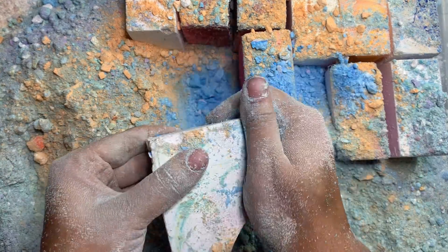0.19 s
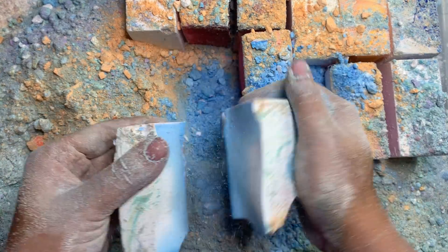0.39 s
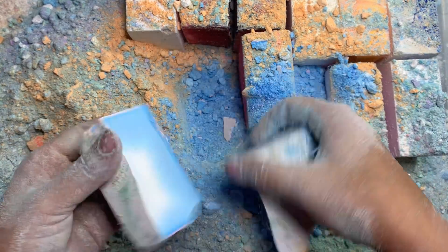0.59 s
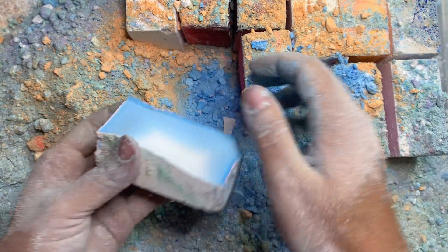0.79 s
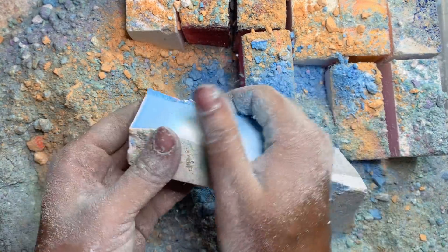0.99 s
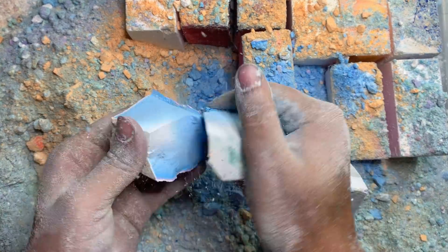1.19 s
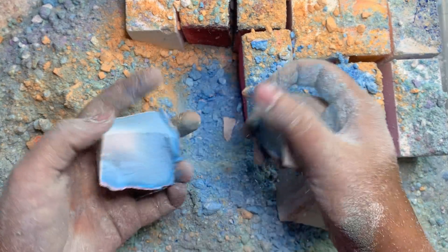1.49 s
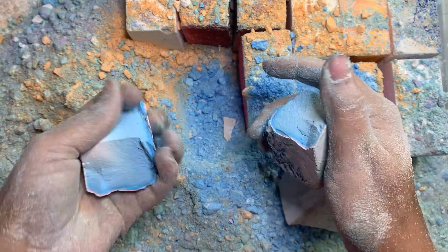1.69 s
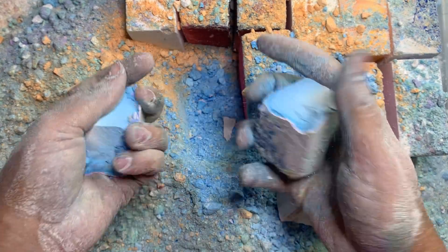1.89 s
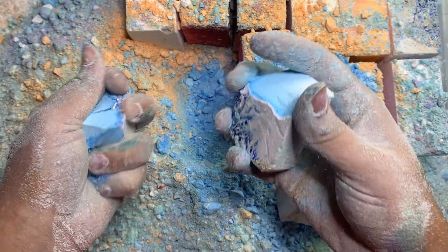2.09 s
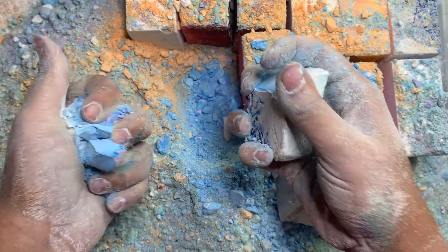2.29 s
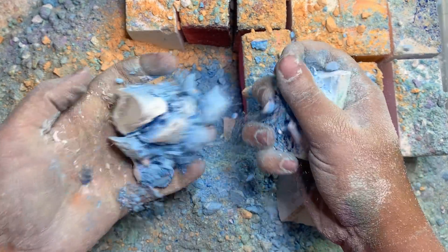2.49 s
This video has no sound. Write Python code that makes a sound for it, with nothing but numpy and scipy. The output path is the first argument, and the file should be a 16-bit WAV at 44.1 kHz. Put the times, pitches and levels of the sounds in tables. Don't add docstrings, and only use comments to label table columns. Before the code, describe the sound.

Chalk block breaking in hands, close up: a crisp snap with dull thump, dusty rubbing and small squeaks, a second snap, more rubbing, then irregular crunching into crumbs; small room, faint low ventilation hum, stereo phone microphone.

```python
import sys
import numpy as np
from scipy import signal
from scipy.fft import rfft, irfft, next_fast_len
from scipy.io import wavfile
from scipy.ndimage import uniform_filter1d

SR = 44100
rng = np.random.default_rng(int(sys.argv[2]) if len(sys.argv) > 2 else 0)


def decibels_to_gain(level_db):
    exponent = np.asarray(level_db, float) / 20
    return 10 ** exponent


def unload_wav(signal):
    wavfile.write(
        sys.argv[1],
        SR,
        np.round(np.clip(np.atleast_2d(signal).T, -1, 1) * 32767).astype(np.int16),
    )


N = 116865


def band(x, hz, width_hz):
    return signal.lfilter(*signal.iirpeak(min(hz, 18000), hz / width_hz, fs=SR), x)


def double_band(x, hz, width_hz, ratio=2):
    return band(band(x, hz, width_hz), hz, ratio * width_hz)


def low_cut(x, hz, order):
    return signal.lfilter(*signal.butter(order, hz, "high", fs=SR), x)


def unit(x):
    return x / np.sqrt(np.mean(x ** 2) + 1e-18)


def walk(rate_per_s):
    k = int(SR / rate_per_s)
    return unit(uniform_filter1d(uniform_filter1d(rng.standard_normal(N), k), k))


def curve(points):
    return np.interp(np.arange(N) / SR, *np.array(points).T)


def add(out, at_s, x):
    i = int(at_s * SR)
    out[i:i + len(x)] += x[:N - i]


def grit(per_s, spread_db, size):
    chance, sign, strength = rng.random((size, 3)).T
    grains = (chance < per_s / SR) * np.sign(sign - .5)
    return unit(grains * decibels_to_gain(-spread_db * np.log(strength + 0.00083)))


# t/s, level/dB
RUSTLE_SWELL = [(0, 0), (.2, -11), (.37, -3), (.6, 0.5), (.76, -0.5), (.92, -15), (1.03, 3.5), (1.25, 3),
                (1.55, 3), (1.79, 4.5), (2.1, 4), (2.38, -5), (2.65, 7.5)]


def rustle_db():
    return curve(RUSTLE_SWELL)


# f/Hz, width/Hz, level/dB
HUM_BANDS = [
    (40.1, 9.2, -58.5),
    (66.7, 16, -56),
    (97.9, 13.6, -60.5),
    (133.8, 19, -54),
    (312.6, 99, -65),
    (419, 106, -66),
    (539, 58, -70.5),
    (944, 560, -77.5),
    (1480, 3000, -87),
]
# t/s, level/dB
RUMBLE_SWELL = [(0.0, -62), (0.221, -61.5), (0.33, -56.5), (0.55, -63.5), (0.729, -67), (1.0, -72.5),
                (1.22, -66), (1.39, -68), (2.38, -68.5), (2.52, -63), (2.65, -65)]
RUMBLE_FROM_HZ, RUSTLE_FROM_HZ, HUM_SIDE_HZ = 250, 700, 600
HUM_WAVER_DB, HUM_WAVER_PER_S = 1.3, 4


def hum():
    out = 0
    swell_db = curve(RUMBLE_SWELL)
    for hz, width_hz, db in HUM_BANDS:
        mid, side = (unit(double_band(rng.standard_normal(N), hz, width_hz, 1.72)) for _ in range(2))
        level_db = db + HUM_WAVER_DB * walk(HUM_WAVER_PER_S)
        if hz > RUSTLE_FROM_HZ:
            level_db = level_db + rustle_db()
        elif hz > RUMBLE_FROM_HZ:
            level_db = level_db + swell_db - swell_db.mean()
        ports = mid + min(hz / HUM_SIDE_HZ, 1) * side * np.array([[1], [-1]])
        out = out + decibels_to_gain(level_db) * ports
    return out


ROOM_DB, ROOM_T60_LOW_S, ROOM_T60_HIGH_S, ROOM_TREBLE_DB, ROOM_SPLIT_HZ = -17, 0.23, 0.21, 5.5, 1620
ROOM_WIDE_HZ, ROOM_WIDE_DB = 2200, 3


def room(x):
    t = np.arange(SR // 2) / SR
    mid, side = rng.standard_normal((2, len(t)))
    side = double_band(side, ROOM_WIDE_HZ, 3 * ROOM_WIDE_HZ, 1)
    noise = mid + decibels_to_gain(ROOM_WIDE_DB) * side * np.array([[1], [-1]])
    low = signal.lfilter(*signal.butter(2, ROOM_SPLIT_HZ, fs=SR), noise)
    bass = unit(low * decibels_to_gain(-60 * t / ROOM_T60_LOW_S))
    treble = unit((noise - low) * decibels_to_gain(-60 * t / ROOM_T60_HIGH_S))
    tail = bass + decibels_to_gain(ROOM_TREBLE_DB) * treble
    tail = tail * np.clip(t / 0.002, 0, 1) / np.sqrt(len(t))
    return decibels_to_gain(ROOM_DB) * signal.fftconvolve(x[None], tail, axes=1)[:, :N]


DUST_DB = -72


def dust():
    level_db = DUST_DB + rustle_db() + 1.5 * walk(36)
    return decibels_to_gain(level_db) * grit(14000, 0.83, size=N)


# f ratio, level/dB
UPPER_RINGS = [
    (1.13, -4),
    (1.5, -7.5),
    (2.101, -5.5),
]
PATCHY_DB, RELEASE_S, SAG_DB = 4, .011, -4


def patchy_hiss(x, low_hz):
    steps = np.repeat(rng.standard_normal((8, 30)), len(x) // 30, axis=1)
    drifts = uniform_filter1d(steps, size=300, axis=1)
    hiss = 0
    for k, (hz, drift) in enumerate(zip(np.geomspace(low_hz, 14000, 8), drifts)):
        delayed = np.roll(x, 90 * (k // 3))
        hiss = hiss + decibels_to_gain(PATCHY_DB * drift) * band(delayed, hz, hz / 4)
    return hiss


def strokes(rows, per_s, spread_db, q, hiss_db, low_hz, rise_share):
    out, t = np.zeros(N), np.arange(SR // 5) / SR
    for start_s, length_s, db, hz in rows:
        grains = grit(per_s, spread_db, size=len(t))
        ring = double_band(grains, hz, hz / q)
        for ratio, ring_db in UPPER_RINGS:
            ring = ring + decibels_to_gain(ring_db) * band(grains, ratio * hz, hz / q)
        x = unit(unit(ring) + decibels_to_gain(hiss_db) * unit(patchy_hiss(grains, low_hz)))
        rise = np.clip(t / (rise_share * length_s), 0, 1)
        release = np.exp(-np.maximum(t - length_s, 0) / RELEASE_S)
        add(out, start_s, decibels_to_gain(db) * rise * decibels_to_gain(SAG_DB * t / length_s) * release * x)
    return out


# t/s, length/s, level/dB, ring f/Hz
SQUEAK_EVENTS = [
    (.475, 0.052, -61, 3920),
    (.53, 0.098, -65.5, 4460),
    (.595, 0.026, -68, 2065),
    (.645, 0.031, -58.5, 4480),
    (.652, 0.061, -59.5, 2160),
    (.735, 0.0049, -57, 3650),
    (.926, 0.019, -48.5, 6210),
    (1.245, 0.027, -69, 6750),
    (1.553, 0.012, -56.5, 5510),
]


def squeaks():
    return strokes(SQUEAK_EVENTS, 11000, 0.87, q=22, hiss_db=-20, low_hz=3000, rise_share=0.13)


# t/s, length/s, level/dB, cupped-hand ring f/Hz
RUB_EVENTS = [(0, 0.01, -68.5, 2000), (.075, 0.024, -71, 6070), (.21, .03, -71, 6040),
              (.85, 0.0067, -67, 5000), (.395, 0.04, -65.5, 3740), (.466, 0.045, -56, 4170),
              (.5, 0.096, -62, 4430), (.585, 0.11, -58, 4300), (.635, 0.026, -52, 4000),
              (.69, 0.035, -68, 3970), (.727, 0.016, -56, 5800), (.87, 0.088, -67, 6400),
              (.924, 0.075, -53, 5500), (1.012, 0.057, -62.5, 6600), (1.106, 0.014, -71, 3500),
              (1.12, 0.053, -56.5, 6950), (1.65, 0.19, -61.5, 6500), (1.243, 0.028, -57, 6740),
              (1.283, 0.016, -56, 6700), (1.31, 0.068, -67, 6140), (1.35, 0.019, -52, 4470),
              (1.41, 0.016, -64, 5170), (1.495, 0.043, -55.5, 4920), (1.548, 0.063, -64.5, 5930),
              (1.612, 0.019, -50, 6000), (1.712, 0.026, -54.5, 5170), (1.775, 0.03, -55.5, 4102)]


def rubs():
    return strokes(RUB_EVENTS, 17000, 0.73, q=8, hiss_db=4.5, low_hz=3000, rise_share=0.34)


# t/s, length/s, level/dB, crumb ring f/Hz
CRUMBLE_EVENTS = [(1.84, 0.32, -63.5, 2500), (1.936, 0.011, -46, 2350), (1.947, 0.04, -79, 2110),
                  (1.112, 0.079, -62, 2250), (2.0, 0.017, -45.5, 1810), (2.04, 0.044, -59, 2280),
                  (2.093, 0.032, -57.5, 2400), (2.133, 0.0053, -42, 2000), (2.186, 0.087, -59.5, 1980),
                  (2.326, 0.085, -52.5, 4100), (2.35, 0.021, -43, 1360), (2.393, 0.13, -63.5, 3300),
                  (2.546, 0.016, -52, 3740), (2.585, 0.11, -63, 2000)]


def crumbles():
    return strokes(CRUMBLE_EVENTS, 2800, 4.3, q=2.5, hiss_db=1, low_hz=1080, rise_share=0.057)


CRACK_RISE_S, CRACK_SPREAD_DB, DEBRIS_DB, DEBRIS_S = .002, 3, -16.5, 0.0046


def bursts(rows, q):
    out, t = np.zeros(N), np.arange(SR // 8) / SR
    rise = np.clip(t / CRACK_RISE_S, 0, 1) ** 3
    debris = decibels_to_gain(DEBRIS_DB) * np.exp(-t / DEBRIS_S)
    for start_s, db, hz, length_s, hiss_db in rows:
        burst = np.exp(-np.maximum(t - CRACK_RISE_S, 0) / length_s)
        grains = rise * (burst + debris) * grit(15000, CRACK_SPREAD_DB, size=len(t))
        x = unit(double_band(grains, hz, hz / q)) + decibels_to_gain(hiss_db) * unit(grains)
        peak = 2 * np.max(uniform_filter1d(np.abs(x), size=40))
        add(out, start_s, decibels_to_gain(db) * x / peak)
    return out


# t/s, peak level/dB, ring f/Hz, burst length/s, bright hiss/dB
CHIP_EVENTS = [(.035, -72, 2570, 0.0016, 2), (.142, -72, 3100, 0.0014, -9), (.649, -29, 4490, 0.0024, -17),
               (.6495, -33, 6200, 0.0025, -20), (1.098, -31.5, 6600, 0.00067, -11),
               (1.107, -34, 3260, .003, -14), (1.119, -65, 3960, .002, -13), (.251, -34, 6740, 0.0032, 0),
               (.258, -56, 5930, .001, -4), (1.903, -49, 6000, 0.00075, 11), (1.929, -52, 7000, .001, 8),
               (1.917, -43, 2550, 0.00089, 0), (1.999, -52, 2000, 0.0011, -6),
               (2.056, -63, 2130, 0.00091, -5), (2.176, -48.5, 6960, 0.0012, 13),
               (2.361, -38, 3080, .002, -11), (2.371, -38.5, 994, 0.0023, -6),
               (2.098, -40, 6600, 0.0022, 6), (2.338, -50, 2230, 0.00089, -10),
               (2.329, -41, 4240, .002, 22), (2.408, -50, 3530, .001, 1), (2.591, -54, 1530, .002, -10)]


def chips():
    return bursts(CHIP_EVENTS, q=6.2)


# t/s, peak level/dB, thump f/Hz, t60/s
THUMP_EVENTS = [
    (0.24, -19.5, 312.3, 0.052),
    (1.106, -25, 327, 0.048),
    (1.1003, -29.5, 817, 0.013),
    (0.2436, -31, 1414, 0.008),
    (1.944, -39.5, 310, 0.087),
    (2.354, -38.5, 440, 0.042),
    (2.099, -45, 332, 0.14),
    (2.377, -40, 620, 0.034),
    (2.631, -44, 370, 0.038),
]
# f ratio, level/dB
THUMP_MODES = [
    (1, 0),
    (1.2, -4),
    (1.55, -9),
    (2.1, -16),
    (3.1, -20),
]
THUMP_LOW_HZ, SWAY_HZ, SWAY_DB, SWAY_S = 264, 105, -19, 0.015


def thumps():
    out, t = np.zeros(N), np.arange(SR // 5) / SR
    sway = decibels_to_gain(SWAY_DB) * np.sin(2 * np.pi * SWAY_HZ * t) * t / SWAY_S * np.exp(1 - t / SWAY_S)
    for start_s, db, hz, t60_s in THUMP_EVENTS:
        modes = sum(decibels_to_gain(mode_db) * np.sin(2 * np.pi * ratio * hz * t) for ratio, mode_db in THUMP_MODES)
        ring = low_cut(modes * np.exp(-np.log(1000) * t / t60_s), THUMP_LOW_HZ, 2)
        add(out, start_s, -decibels_to_gain(db) * (ring + sway))
    return out


# t/s, peak level/dB, ring f/Hz, burst length/s, bright hiss/dB
CRACK_EVENTS = [(0.179, -45, 3300, 0.0013, 16), (0.2285, -47, 2210, 0.002, -14),
                (0.2412, -18, 2820, 0.0016, 1), (0.6495, -40.5, 1420, 0.00075, 16),
                (1.0979, -19.5, 3700, 0.00059, 5), (1.7694, -43, 2180, 0.009, 11),
                (1.843, -46, 2240, 0.00092, 9), (1.8786, -43.5, 3820, 0.0018, 29),
                (1.914, -41, 5950, 0.0047, -3), (1.9418, -24, 2380, 0.0011, -5),
                (2.0035, -40, 1890, 0.0015, -9), (2.058, -46.5, 4100, 0.0022, -4),
                (2.0927, -33.5, 2750, 0.002, 47), (2.1228, -36, 2440, 0.00071, 7),
                (2.13, -30.5, 2000, 0.0017, -13), (2.1844, -35, 6340, 0.00073, 8),
                (2.28, -50, 7500, 0.0036, 12), (2.294, -37.5, 2120, 0.0026, 27),
                (2.3183, -37, 2480, 0.0013, 7), (2.3535, -33.5, 1410, 0.0033, 38.5),
                (2.3815, -40, 4300, 0.0033, -12), (2.4307, -44.5, 2380, 0.0028, 6),
                (2.5664, -42.5, 1750, 0.0023, -14), (2.6302, -31, 2750, 0.0014, -14),
                (2.622, -47, 2400, .003, -20)]


def cracks():
    return bursts(CRACK_EVENTS, q=1.2)


def scene():
    fine = dust() + squeaks() + rubs() + crumbles() + chips() + cracks()
    hands = low_cut(fine, 600, 1) + thumps()
    return hands + room(hands) + hum()


# f/Hz, width/Hz, level/dB
MIC_BANDS = [
    (2000, 560, 2.5),
    (3500, 500, -4),
    (4100, 1690, 5),
    (6600, 5100, 1),
    (7800, 2120, -4),
    (11400, 8600, 3),
    (9630, 300, -4),
]
MIC_TILT_HZ, MIC_TILT_DB, MIC_LOW_HZ = 5000, -4, 34.7


def microphone(x):
    x = x + (decibels_to_gain(MIC_TILT_DB) - 1) * low_cut(x, MIC_TILT_HZ, 1)
    for hz, width_hz, db in MIC_BANDS:
        x = x + (decibels_to_gain(db) - 1) * band(x, hz, width_hz)
    return signal.sosfilt(signal.butter(4, MIC_LOW_HZ, "high", fs=SR, output="sos"), x)


# f/Hz, phase/rad
PORT_LAG = [(0, 0), (350, .25), (700, 1.5), (1400, .1), (2100, .9), (2900, 2.3), (4100, 1.6), (4900, 3.1),
            (5400, 4.6), (6500, 6), (7450, 6.4), (9300, 9.1), (10200, 9.7), (11800, 12.4), (12900, 12.9),
            (14600, 15.5), (15200, 15.9), (16500, 16.5)]
# f/Hz, level/dB
PORT_BALANCE = [
    (0, -1),
    (150, -2.5),
    (600, 0),
    (1700, -3.5),
    (3000, -1),
    (5500, 1.5),
    (7000, 0),
    (16000, 0),
]
MIC_TOP_HZ, MIC_LEAK_DB, MIC_CUT_HZ = 14600, -4, 16000


def ports(x):
    size = next_fast_len(N + 512)
    f = np.fft.rfftfreq(size, 1 / SR)
    lean_db = np.interp(f, *np.array(PORT_BALANCE).T)
    lag_rad = np.interp(f, *np.array(PORT_LAG).T)
    half = decibels_to_gain(lean_db / 2) * np.exp(.5j * lag_rad)
    top = np.where(f > MIC_TOP_HZ, decibels_to_gain(MIC_LEAK_DB), 1) * (f < MIC_CUT_HZ)
    return irfft(rfft(x, size) * np.array([half, 1 / half]) * top, size)[:, :N]


def roll_off(x):
    return signal.sosfilt(signal.butter(12, 16500, fs=SR, output="sos"), x)


def record(dry):
    mix = ports(microphone(dry))
    return roll_off(mix)


dry = scene()
out = record(dry)
unload_wav(out)
```